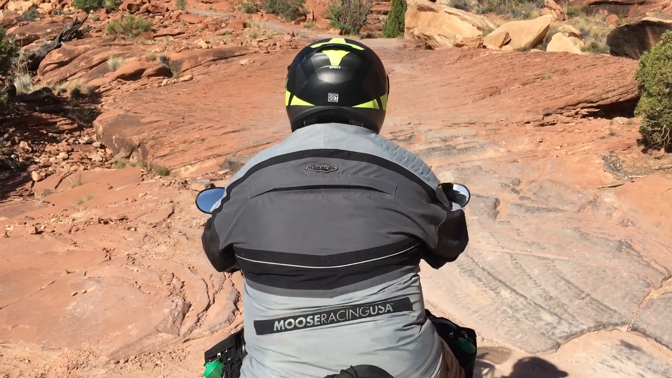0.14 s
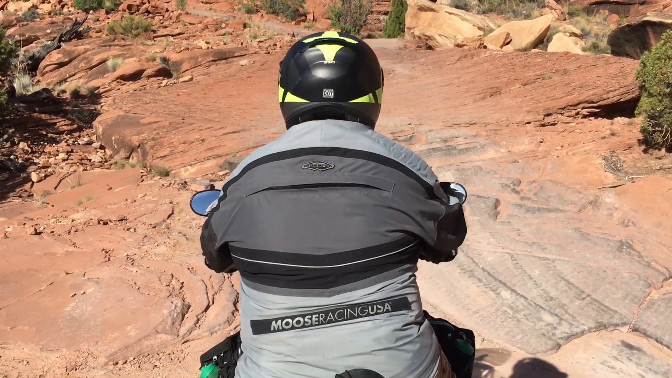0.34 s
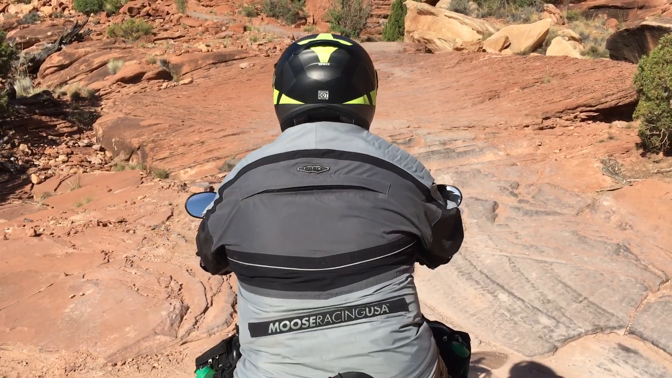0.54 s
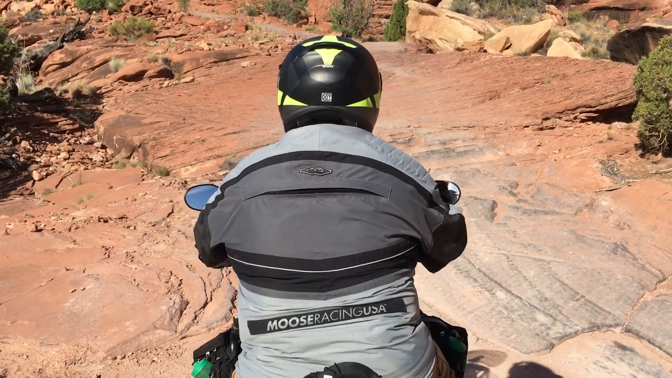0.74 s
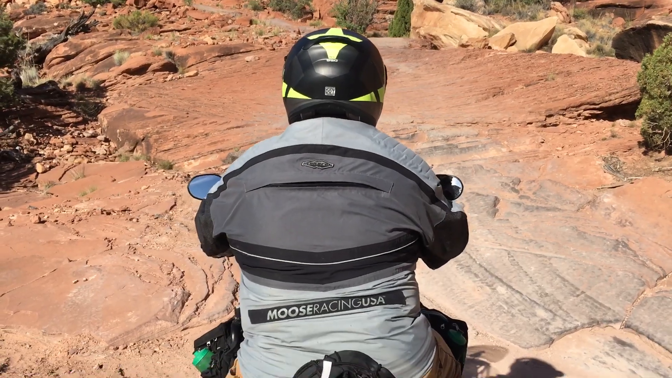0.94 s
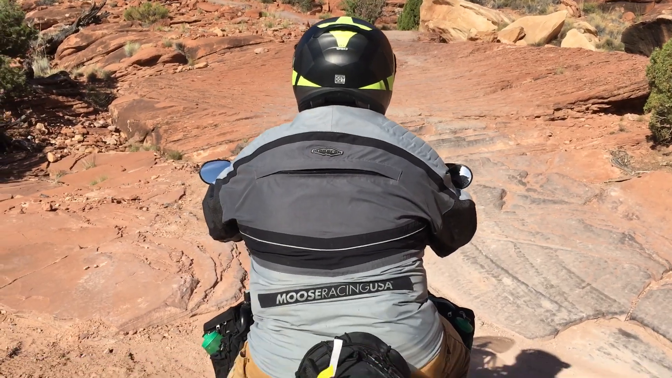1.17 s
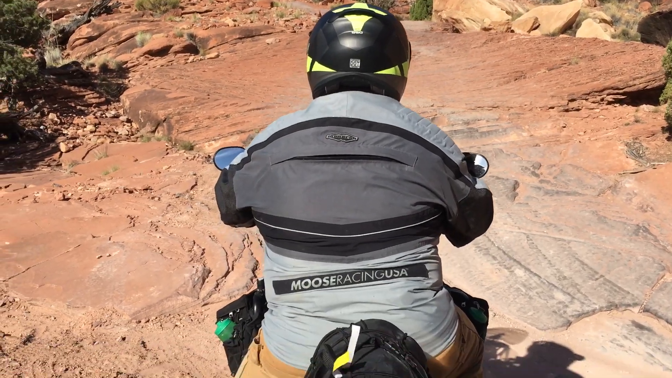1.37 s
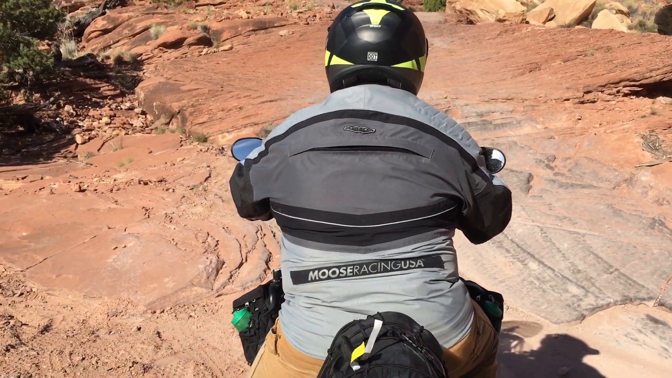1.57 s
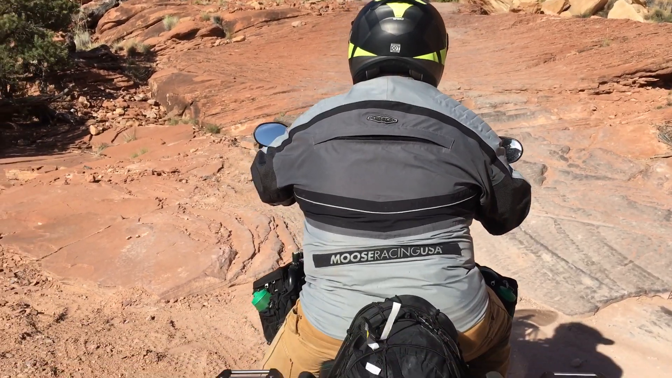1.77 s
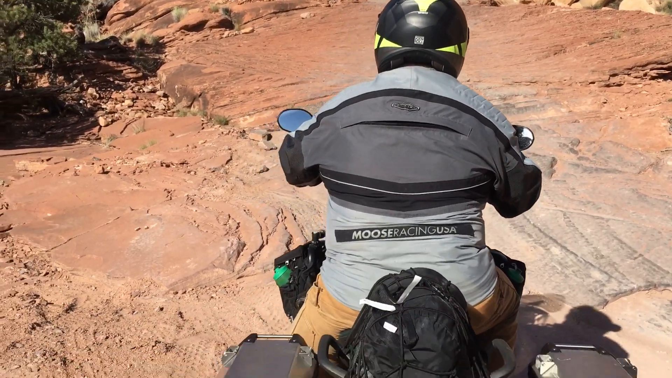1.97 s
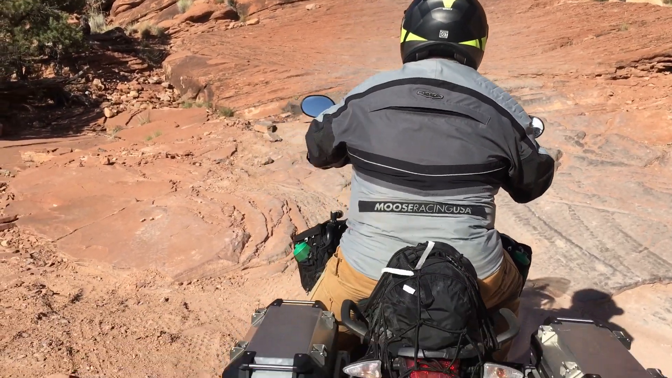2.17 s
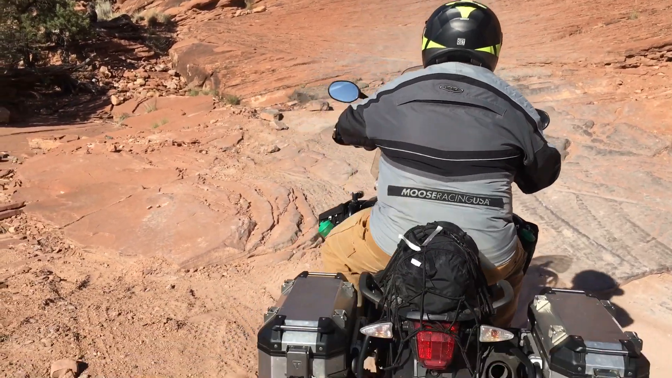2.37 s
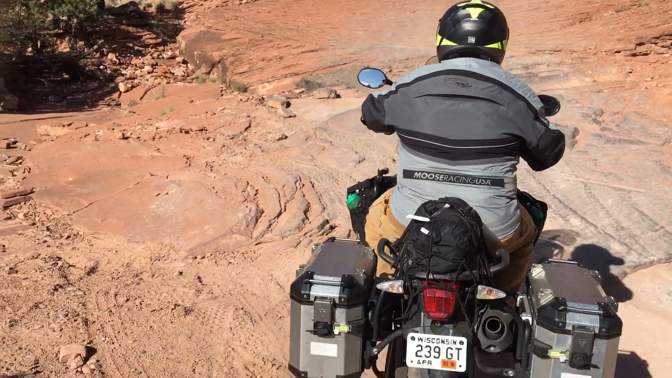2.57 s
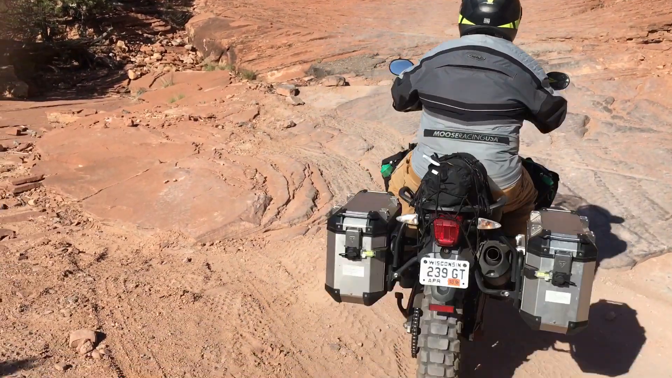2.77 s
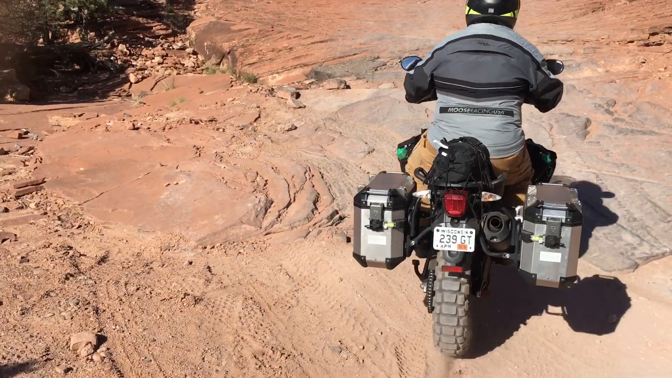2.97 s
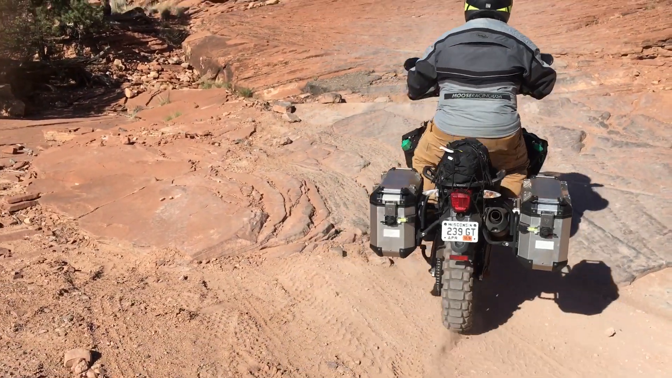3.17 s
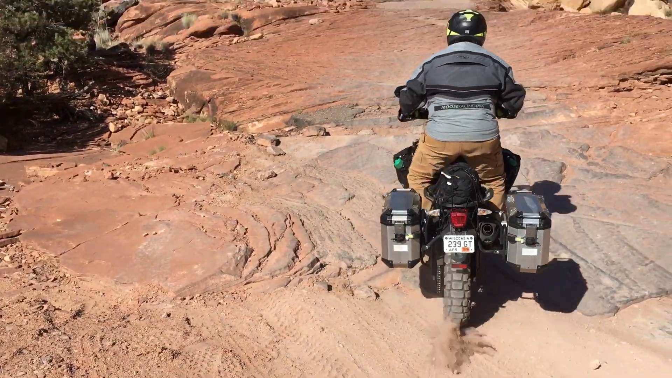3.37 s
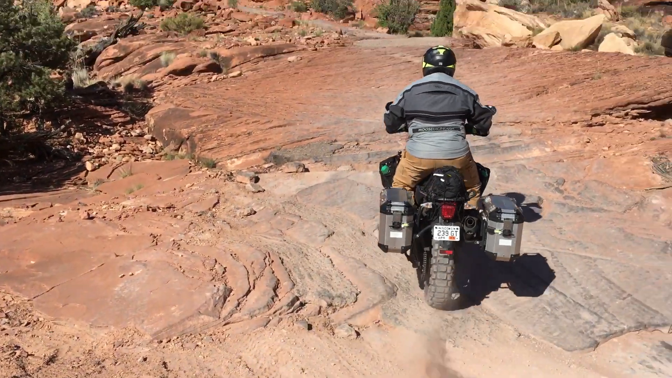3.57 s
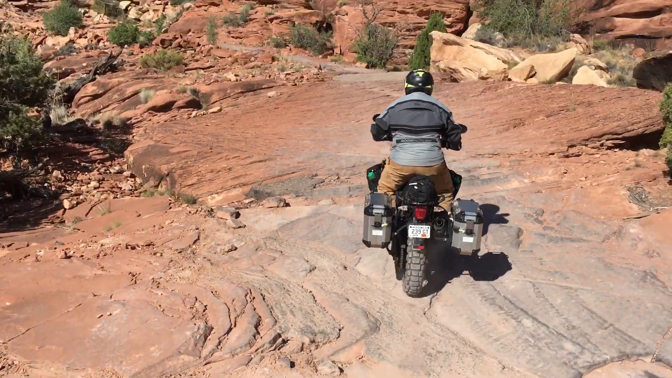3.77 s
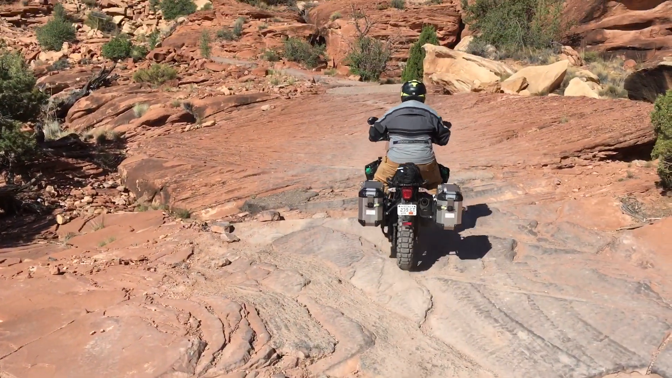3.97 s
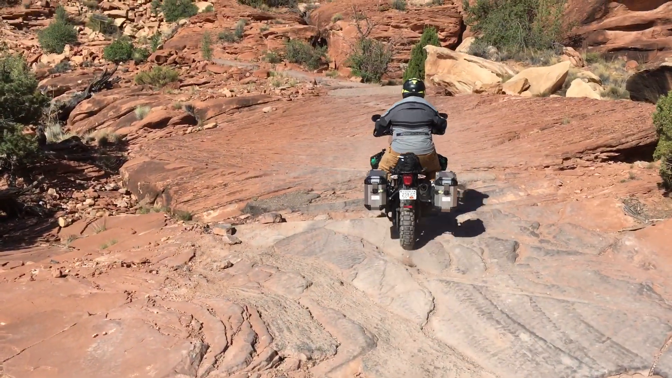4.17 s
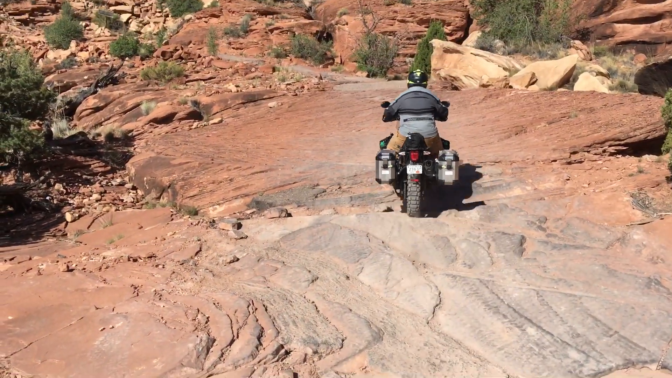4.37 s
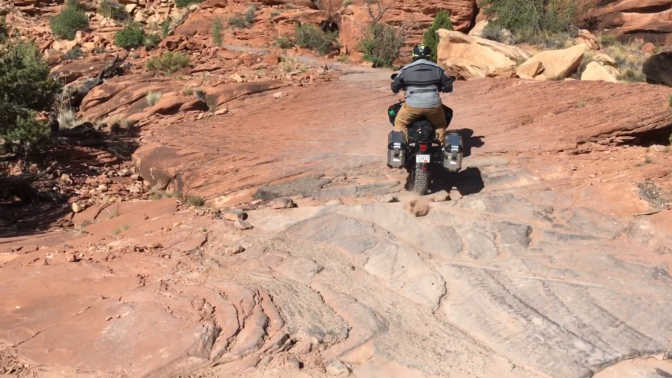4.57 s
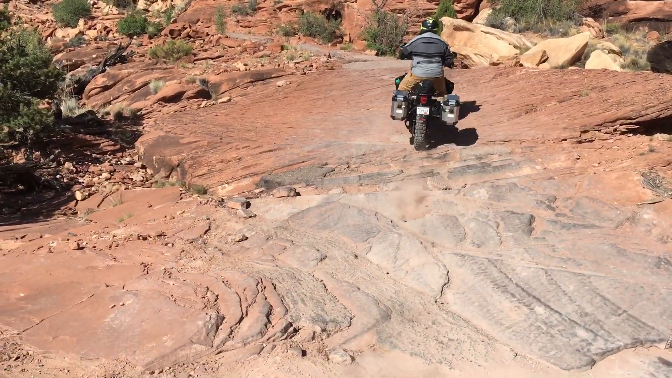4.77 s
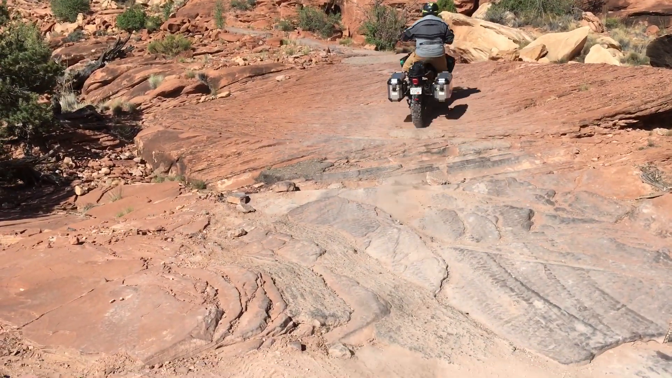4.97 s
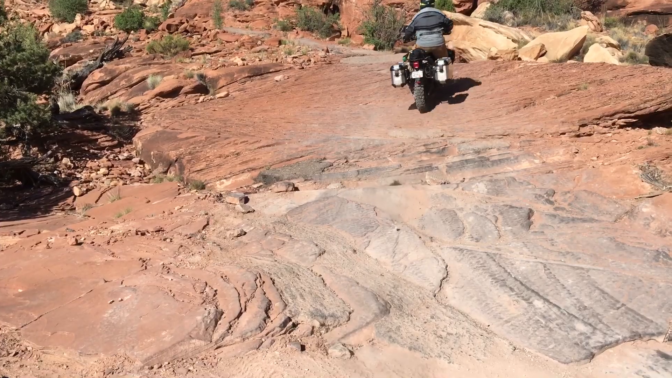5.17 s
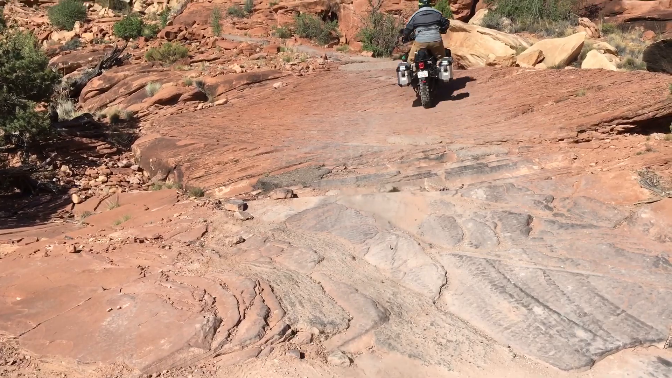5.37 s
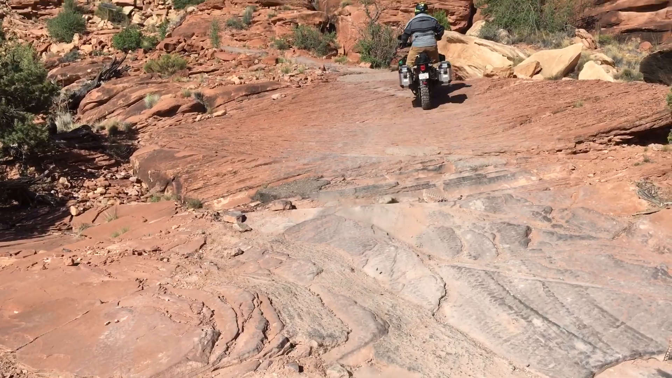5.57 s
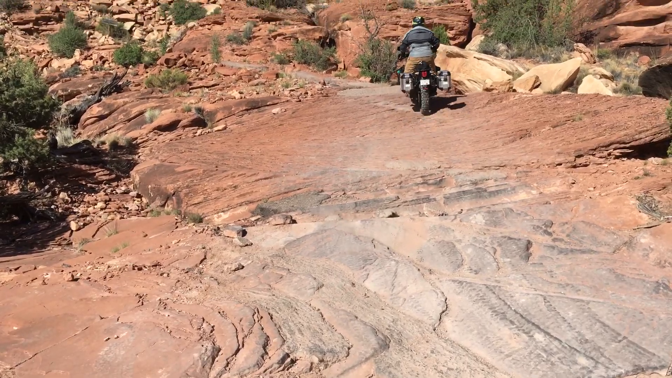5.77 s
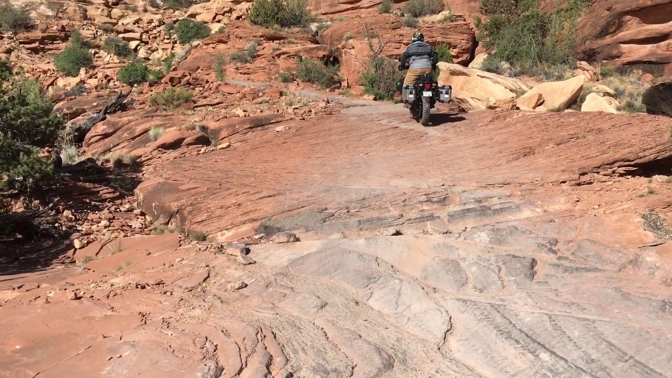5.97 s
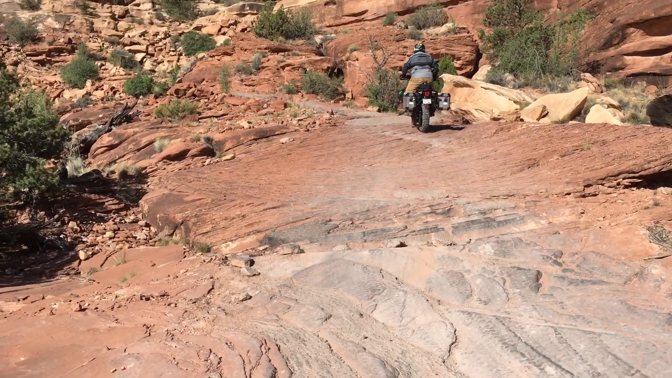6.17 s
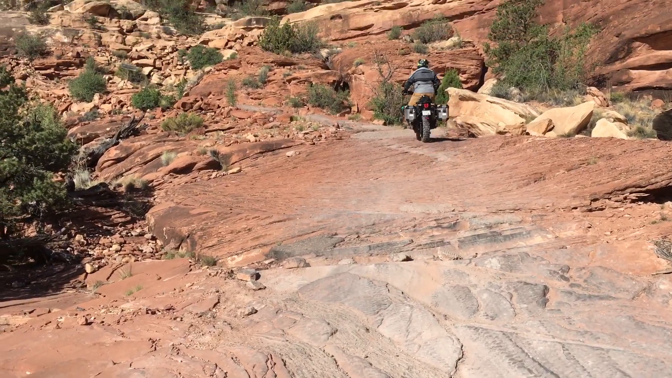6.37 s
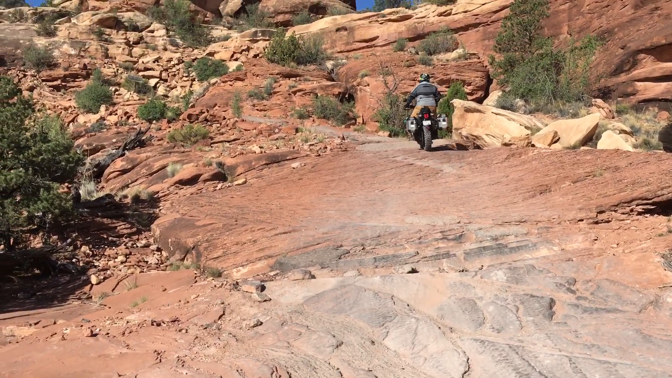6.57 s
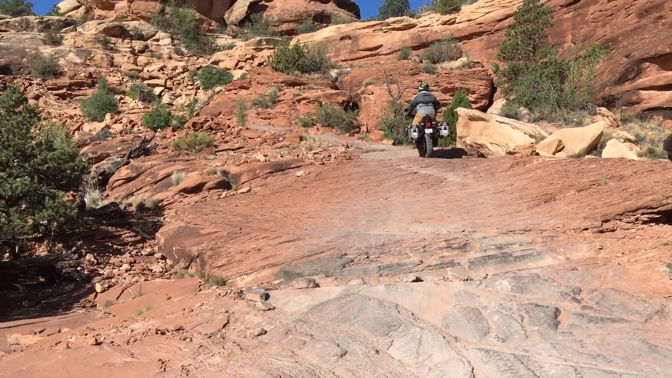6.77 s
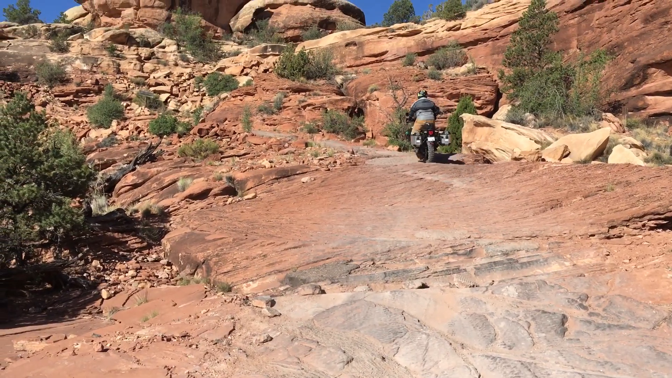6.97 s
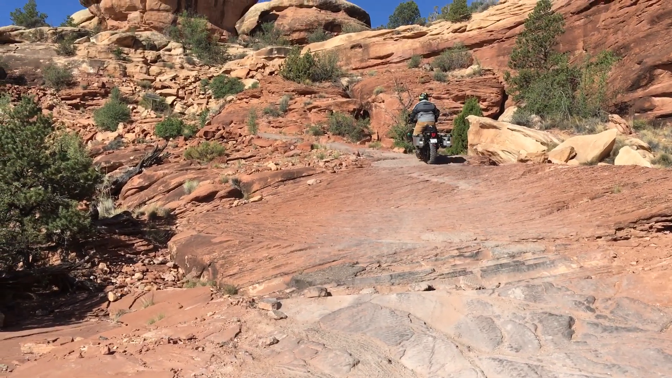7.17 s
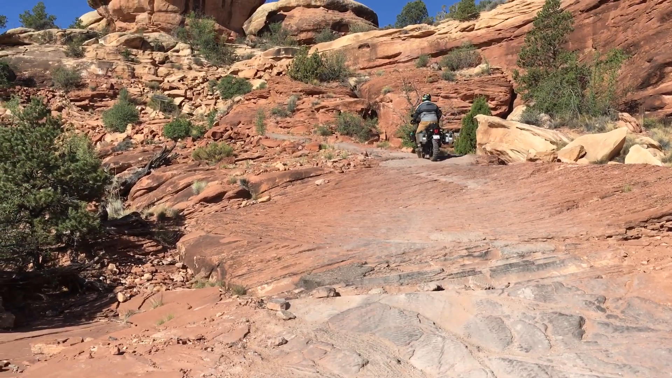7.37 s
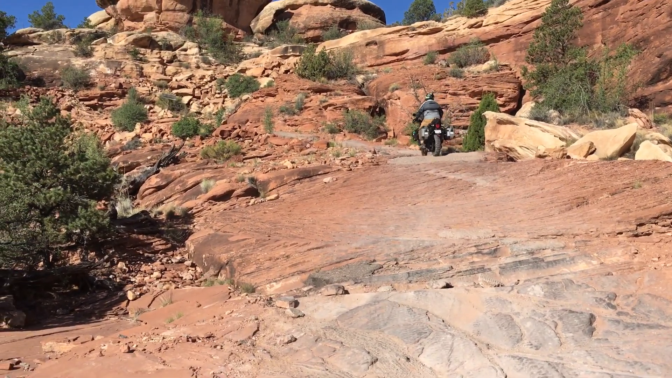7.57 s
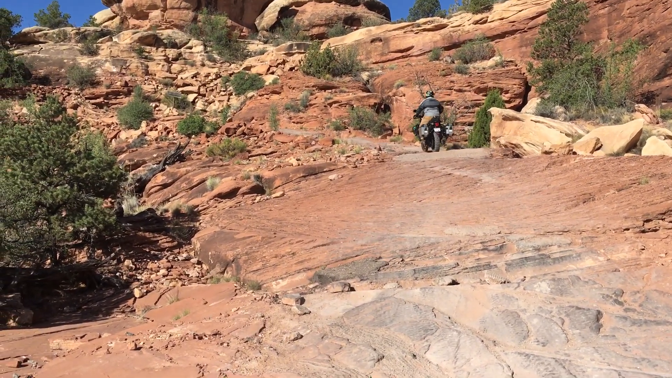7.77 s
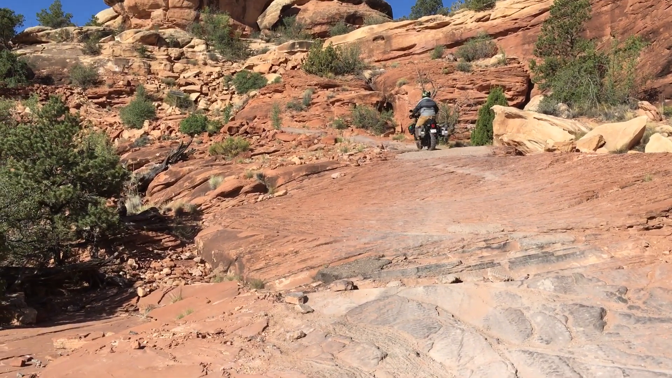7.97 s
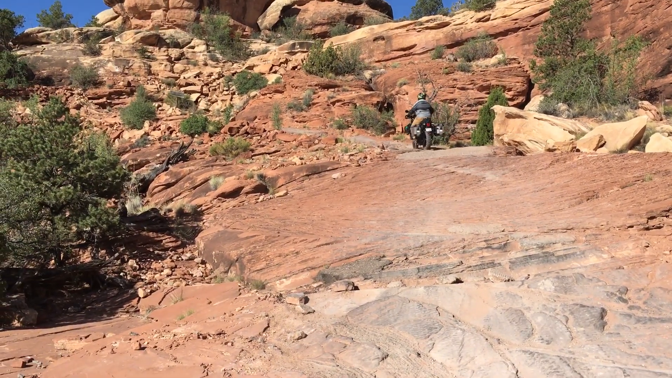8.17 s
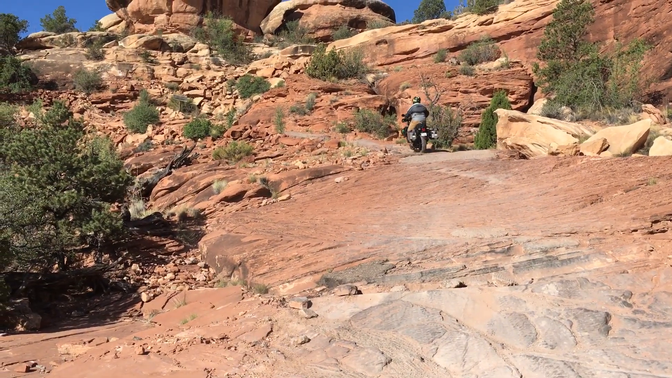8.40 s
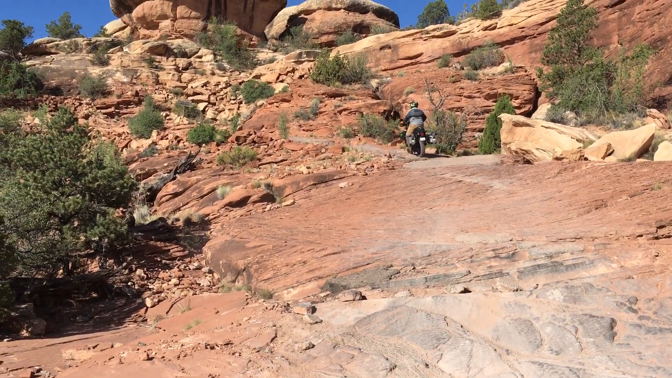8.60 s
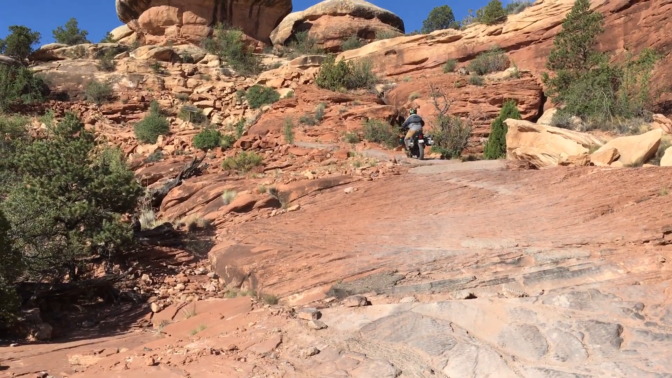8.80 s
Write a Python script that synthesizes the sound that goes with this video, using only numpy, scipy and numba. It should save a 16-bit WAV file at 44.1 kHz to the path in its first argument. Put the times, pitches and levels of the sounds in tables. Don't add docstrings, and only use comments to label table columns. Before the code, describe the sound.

Outdoors on a rocky slope, a nearby motorcycle lopes at idle for about a second, then pulls off with rising revs, hissing exhaust and whining gears. Bursts of throttle surge and drop as tyres spit grit and luggage rattles over ledges. After a stumble and muffled afterfire, two sharp revs rise, then smaller ones recede, duller and thinner. A fixed microphone hears faint low wind and short echoes from rock walls.

```python
import sys
import numpy as np
from scipy import signal
from scipy.fft import rfft, irfft
from scipy.io import wavfile
from scipy.ndimage import uniform_filter1d
from numba import njit

SR = 44100
rng = np.random.default_rng(int(sys.argv[2]) if len(sys.argv) > 2 else 0)


def invert_db(x):
    u = np.asarray(x, float) / 20
    return 10 ** u


def output_pcm(signal):
    pcm = np.clip(np.atleast_2d(signal).T, -1, 1) * 32767
    wavfile.write(sys.argv[1], SR, np.round(pcm).astype(np.int16))


N = 389844


def unit(x):
    return x / np.sqrt(np.mean(x ** 2))


def steady(x, span_s):
    size = int(span_s * SR)
    power = uniform_filter1d(uniform_filter1d(x ** 2, size), size)
    return x / np.sqrt(power + 1e-12)


def columns(table):
    s, *rest = np.transpose(table)
    return [np.interp(np.arange(N) / SR, s, c) for c in rest]


def spans(table, edge_s):
    t = np.arange(N) / SR
    return sum(h * np.clip(np.minimum(t - a, b - t) / edge_s + .5, 0, 1) for a, b, h in table)


def level_spans(table, edge_s):
    return spans([(a, b, invert_db(db)) for a, b, db in table], edge_s)


def cut(x, hz, kind, order=2):
    return signal.sosfilt(signal.butter(order, hz, kind, fs=SR, output="sos"), x)


def cut_in_place(x, hz, kind="low"):
    return signal.sosfiltfilt(signal.butter(4, hz, kind, fs=SR, output="sos"), x)


@njit
def svf(x, hz, width):
    y, b, l = np.empty(len(x)), 0., 0.
    for i in range(len(x)):
        g, k = np.tan(np.pi * hz[i] / SR), width / hz[i]
        v = (b + g * (x[i] - l)) / (1 + g * (g + k))
        b, l, y[i] = 2 * v - b, l + 2 * g * v, k * v
    return y


def modes(x, table, tune=0.901, flip=1):
    out = 0
    for k, (hz, width, db) in enumerate(table):
        out = out + flip ** k * invert_db(db) * svf(x, hz * tune * np.ones(N), 1. * width)
    return out


def coloured(spectrum):
    hz, db = np.transpose(spectrum)
    bins = np.arange(N // 2 + 1) * SR / N + 1
    gain = invert_db(np.interp(np.log(bins), np.log(hz), db))
    return unit(irfft(rfft(rng.standard_normal(N)) * gain, N))


def walk(rate):
    k = int(SR / rate)
    return uniform_filter1d(np.repeat(rng.standard_normal(N // k + 1), k), k)[:N]


# (frequency [Hz], level [dB per Hz])
AIR_SPECTRUM = [(12, -42), (20, -12), (49, -2), (137, 0), (208, -9), (324, -30), (860, -27), (1340, -37),
                (2280, -36), (15600, -57)]


def open_air():
    return invert_db(-45 + 2.2 * walk(1.1)) * coloured(AIR_SPECTRUM)


def rocks(x):
    t = np.arange(SR // 3) / SR
    tail = rng.standard_normal(len(t)) * 1000 ** (-t / 0.28) * (t > .012)
    return invert_db(-9.5) * signal.fftconvolve(x, tail / np.sqrt(np.sum(tail ** 2)))[:N]


HIT_T = np.arange(SR // 8) / SR


def hit_noise(table, band_hz, order=2):
    return cut(rng.standard_normal((len(table), len(HIT_T))), band_hz, "band", order)


def place(times, hits):
    out = np.zeros(N + SR)
    for s, hit in zip(times, hits):
        out[int(s * SR):int(s * SR) + len(hit)] += hit
    return out[:N]


# (time [s], peak level [dB])
SUSPENSION_THUMPS = [(4.187, -13), (4.529, -10), (4.698, -8.5), (4.847, -13), (4.91, -10.5), (4.989, -11)]


def thumps():
    decay = 1000 ** (-HIT_T / 0.054)
    noise = hit_noise(SUSPENSION_THUMPS, [110, 340])
    hits = [invert_db(db - 6.5) * unit(n) * decay for (s, db), n in zip(SUSPENSION_THUMPS, noise)]
    return place([s for s, db in SUSPENSION_THUMPS], hits)


# (time [s], peak level [dB])
GRIT_TICKS = [(2.663, -19), (2.697, -10), (2.795, -20), (2.977, -19), (3.064, -12), (3.9835, -18),
              (4.1707, -16), (4.257, -14), (4.506, -15), (4.53, -12), (4.6433, -9.5), (4.7448, -7.5),
              (4.7556, -13), (4.7816, -4), (4.7908, -5), (4.8305, -14), (4.865, -16), (4.9143, -13),
              (5.1777, -22), (5.228, -11.5), (5.519, -22), (5.595, -22), (5.689, -24), (6.338, -21),
              (6.373, -19.5), (6.424, -13.5), (7.046, -23), (7.24, -23), (7.427, -17.5), (8.1664, -29)]


def grit():
    length_s = 0.0076
    swell = np.exp(-((HIT_T - 0.87 * length_s) / (0.47 * length_s)) ** 2)
    noise = hit_noise(GRIT_TICKS, [3000, 13500])
    hits = [invert_db(db - 19.5) * n * swell for (s, db), n in zip(GRIT_TICKS, noise)]
    return place([s for s, db in GRIT_TICKS], hits)


# (time [s], peak level [dB], ring frequency [Hz])
LUGGAGE_KNOCKS = [(2.7944, -26.5, 815), (3.8897, -26, 885), (3.9963, -23, 720), (4.1929, -25, 757),
                  (4.2183, -26.5, 770), (4.4598, -29, 760), (4.5575, -30, 1500), (4.6483, -31, 1130),
                  (4.6952, -37, 669), (4.7145, -24.5, 1660), (4.803, -27, 1500), (4.9117, -30, 655),
                  (4.9526, -31, 700), (4.9954, -33, 662), (5.0194, -34, 721), (5.1292, -31.5, 1380),
                  (5.343, -32.5, 1500), (5.4778, -30.5, 1310), (5.5226, -36, 1240), (5.6015, -35, 1430),
                  (5.7895, -34, 845), (6.3899, -34.5, 1273), (6.4714, -37, 1200), (6.896, -36.5, 593),
                  (6.9885, -38, 1440), (7.186, -36.5, 1596), (7.373, -37, 1630), (7.9793, -37, 670),
                  (8.1165, -33.5, 1600), (8.7311, -38, 1162)]


def knocks():
    hits = []
    for (s, db, hz), n in zip(LUGGAGE_KNOCKS, hit_noise(LUGGAGE_KNOCKS, [600, 2200], order=3)):
        ring = 1.44 * np.sin(2 * np.pi * hz * HIT_T) * 1000 ** (-HIT_T / .028)
        crack = 0.93 * unit(n) * np.exp(-HIT_T / 0.0053)
        hits.append(invert_db(db + 0.5) * (ring + crack))
    return place([s for s, db, hz in LUGGAGE_KNOCKS], hits)


# (start time [s], end time [s], level [dB])
CHATTER_BURSTS = [(3.38, 3.46, -37), (4.17, 4.23, -37), (4.3, 4.48, -39), (4.5, 4.56, -31),
                  (4.69, 4.73, -37), (4.84, 4.89, -38), (4.912, 4.985, -33), (4.995, 5.03, -30)]
# (frequency [Hz], width [Hz], level [dB])
FRAME_MODES = [(670, 130, 0), (800, 150, -1), (1500, 300, -12)]


def chatter():
    clicks_per_s = 600
    clicks = (rng.random(N) < clicks_per_s / SR) * rng.standard_normal(N)
    ring = cut(modes(clicks, FRAME_MODES, tune=1), [540, 1900], "band")
    return level_spans(CHATTER_BURSTS, .015) * unit(ring)


# (time [s], tail pipe tuning factor as the gas heats, clean share of the bark, distance [m])
RIDE = [(0, .98, 1, 1.5), (1.1, .98, 1, 1.5), (1.6, 1.05, 1.2, 2), (2.5, 1.02, 1.2, 3), (3.2, 1.09, .9, 5),
        (3.5, .9, .5, 8), (5, .85, .4, 16), (6, .95, .5, 24), (7, .9, .5, 30), (8.84, .9, .5, 36)]
START_M = RIDE[0][3]


def ride():
    return columns(RIDE)


# (time [s], firing rate [Hz], eagerness of the swing [0-1], throttle level [dB])
WRIST_TURNS = [(0, 31.16, .5, -5), (1.08, 30.9, 0.61, -4), (1.765, 86.83, .56, 5.5), (2.05, 70.51, .55, 6),
               (2.311, 68.3, 0.61, 4), (2.55, 71.8, .5, 4), (2.87, 45.87, .55, 3.5), (3.35, 93.44, .6, 8.5),
               (3.791, 73.86, .58, 6.5), (4.13, 83.9, .5, 6.5), (4.3, 79.68, .5, 7),
               (4.499, 94.66, .5, 8.5), (4.751, 81.43, .6, 7.5), (5.0, 89.94, .5, 6.5),
               (5.101, 88.93, 0.42, 5), (5.235, 118.1, .5, 8), (5.52, 43.38, .5, 2),
               (5.64, 42.7, 0.25, 0.5), (6.015, 123.6, .52, 10), (6.38, 73.8, .5, 4.5),
               (6.58, 83.25, .6, 3.5), (6.8, 83.58, 0.64, 3), (7.09, 62.88, .6, 2), (7.362, 83.47, .5, 4),
               (7.609, 68.76, .55, 1.5), (7.935, 96, .52, 4.5), (8.3, 60.78, .5, 1.5),
               (8.49, 73.84, .5, 0.5), (8.682, 62, .5, 1), (8.84, 61.5, 0.6, 2.5)]


def wrist():
    roundness = .6
    s, hz, eager, throttle_db = np.transpose(WRIST_TURNS)
    turn = np.interp(np.arange(N) / SR, s, np.arange(len(s)))
    k = np.minimum(turn.astype(int), len(s) - 2)
    bend = np.log(np.clip(eager[k + 1], .1, .9)) / np.log(.5)
    u = (turn - k) ** bend
    u = u + roundness * ((1 - np.cos(np.pi * u)) / 2 - u)
    return [uniform_filter1d(c[k] + u * (c[k + 1] - c[k]), size=SR // 25) for c in (hz, throttle_db)]


# (time [s], level [dB])
ENGINE_LOAD = [(0, -18.5), (1.05, -18), (1.24, -13.5), (1.36, -14), (1.52, -16.5), (1.8, -27.5),
               (2.0, -14.5), (2.9, -14), (3.1, -9.5), (3.3, -13.5), (4.2, -13.5), (5.1, -17.5), (5.6, -21),
               (6.6, -23), (7.3, -23), (7.6, -29), (8.1, -23.5), (8.84, -34.5)]
# (time [s], half length [s], change [dB])
BOOM_STUMBLES = [(1.35, 0.043, -10), (1.45, .03, -11), (4.34, .05, -2), (4.5, 0.022, -1.5),
                 (4.6, 0.051, -2.5), (4.99, .03, -1.5), (5.22, 0.02, 9), (5.298, 0.057, -31),
                 (5.482, 0.057, -8), (5.65, .05, -4), (6.237, 0.038, -16), (6.857, 0.046, -8.5),
                 (7.45, 0.034, -11), (8.307, 0.064, -4.5), (7.73, 0.069, 3), (8.665, 0.066, -9)]
# (time [s], level [dB])
TYRE_GROUND = [(0, -1), (1.1, -0.5), (1.7, 1), (3, 0), (4.9, 2.5), (5.3, 0.5), (6.2, -3.5), (7.1, 2),
               (7.8, -4.5), (8.84, -7.5)]


def levels(hz, throttle_db):
    spread_db = 10
    knee_hz, fall_db = 81, 0.6
    t = np.arange(N) / SR
    heard_db = throttle_db - spread_db * np.log10(ride()[2] / START_M)
    boom_db = columns(ENGINE_LOAD)[0] - fall_db * (np.maximum(hz - knee_hz, 0) / 10) ** 2
    boom_db = boom_db + sum(db * np.exp(-((t - s) / half) ** 2) for s, half, db in BOOM_STUMBLES)
    over_db = -22 + 0.88 * heard_db
    level_db = 10 * np.log10(invert_db(boom_db) ** 2 + invert_db(over_db) ** 2)
    hiss_db = -35.5 + heard_db + columns(TYRE_GROUND)[0]
    return level_db, over_db - level_db, -36.5 + heard_db, hiss_db


def mesh(centre_hz, width):
    ring = svf(svf(rng.standard_normal(N), centre_hz, width), centre_hz, width)
    return steady(ring, .15) * invert_db(3.2 * walk(25))


# (time [s], level [dB])
PRIMARY_PULL = [(0, -20), (1.15, -13), (1.37, -2), (1.5, -5), (2, -5), (2.6, -6), (2.75, -10), (3.1, -12),
                (3.7, -16), (5, -14), (5.22, -8), (5.45, -8), (5.6, -14), (5.72, -6), (6.1, -9), (7.1, -9),
                (8.3, -5), (8.84, -5)]
# (start time [s], end time [s], level [dB])
PRIMARY_OCTAVE = [
    (1.35, 1.6, -13),
    (1.6, 1.85, -16),
    (1.85, 2.62, -21),
    (2.95, 3.47, -19),
]
# (start time [s], end time [s], level [dB])
TIMING_WHINE = [
    (-1, 1.5, -6),
    (1.5, 1.68, -14),
    (1.68, 1.95, -24),
    (1.95, 2.7, -12),
    (5.5, 5.7, -12),
]


def gears(hz, hiss_db):
    sag_per_m = 0.00085
    primary_hz = 34.25 * (1 - sag_per_m * ride()[2]) * hz
    timing_hz = 80.9 * hz + 253
    primary = invert_db(columns(PRIMARY_PULL)[0]) * mesh(primary_hz, 230.0)
    octave = level_spans(PRIMARY_OCTAVE, .12) * mesh(2 * primary_hz, 260.0)
    timing = level_spans(TIMING_WHINE, .12) * mesh(timing_hz, 230.0)
    throb = 1 + .35 * np.cos(2 * np.pi * np.cumsum(hz) / SR)
    return invert_db(hiss_db) * throb * (primary + octave + timing)


# (frequency [Hz], level [dB per Hz])
GAS_SPECTRUM = [(710, -38), (1200, 0.5), (1390, 0), (1990, -0.5), (2240, -5), (3190, -3), (6060, -8.5),
                (7680, -13.5), (8640, -9.5), (10400, -13), (15600, -8)]


def hiss(puff, metres):
    out = steady((0.69 * puff + 0.33) * invert_db(2.1 * walk(40)) * coloured(GAS_SPECTRUM), 0.098)
    out = out - np.clip(1.1 - 0.36 * metres, 0, .5) * cut(out, 3300, "high")
    return out + (invert_db(.5 - .18 * metres) - 1) * cut(out, 6600, "high")


# (frequency [Hz], width [Hz], level [dB])
TAIL_PIPE = [(590, 80, 1), (710, 200, -7), (850, 120, 2.5), (1100, 280, -15), (1656, 126, -9)]
# (frequency [Hz], width [Hz], level [dB])
FAR_CASES = [(420, 85, -2.5), (626, 270, 8), (987.4, 380, -17), (1600, 180, -8.5)]


def bark(pulses, rush):
    tune, clean, metres = ride()
    sharp = steady(pulses, .06)
    crack = 1.2 * cut(sharp, [520, 950], "band")
    tune = tune * (1 + .0015 * metres * walk(9))
    near = cut(modes(clean * crack + rush, TAIL_PIPE, tune), 490, "high", order=4)
    distant = modes(rush + clean * sharp, FAR_CASES, tune=0.94)
    far = .72 * np.clip((metres - 15) / (29 - 15), 0, 1)
    return steady((1 - far) * steady(near, .2) + far * steady(distant, .2), 0.04)


def gas(pulses, bark_db, hiss_db):
    metres = ride()[2]
    pulses = np.roll(pulses, int(.009 * SR))
    puff = unit(signal.lfilter([1], [1, -np.exp(-1 / (0.027 * SR))], pulses))
    rush = steady((puff + .8) * rng.standard_normal(N) * invert_db(2.0 * walk(30)), .1)
    rumble = steady(cut(rush, [230, 380], "band"), 0.06)
    voice = bark(pulses, rush) + invert_db(-7 - 0.12 * metres) * rumble
    return invert_db(bark_db) * voice + invert_db(hiss_db - 2.5) * hiss(puff, metres)


# (time [s], half length [s], ring frequency [Hz], peak level [dB])
SILENCER_WOOFS = [
    (5.272, .022, 80, -17),
    (6.03, .07, 78, -31),
    (6.2, .03, 90, -30),
    (7.415, .012, 66, -25),
    (8.51, .015, 74, -22),
]


def afterfires():
    t = np.arange(N) / SR
    out = np.zeros(N)
    for s, half, hz, db in SILENCER_WOOFS:
        out += invert_db(db) * np.exp(-((t - s) / half) ** 2) * np.sin(2 * np.pi * hz * (t - s))
    return out


# (start time [s], end time [s], roughness [0-1])
ROUGH_RUNNING = [
    (5.26, 5.52, .55),
    (6.22, 6.27, .25),
    (7.39, 7.43, .9),
    (8.48, 8.54, .9),
]


def burn():
    idle_ends_s, idle_fade_s = 1.1, .4
    idle = np.clip(1 - (np.arange(N) / SR - idle_ends_s) / idle_fade_s, 0, 1)
    rough = spans(ROUGH_RUNNING, .06)
    depth = .08 + .92 * idle + .25 * rough
    return depth, .35 + .15 * idle + 4.5 * rough, .0035 + .05 * rough


CYLINDER_LEVELS = [8, 11, 6]


def firings(hz):
    depth, scatter_db, jitter = burn()
    turns = .48 + np.cumsum(hz) / SR
    count = np.arange(0, int(turns[-1]) + 1)
    at = np.interp(count, turns, np.arange(N))
    i = at.astype(int)
    chance = rng.standard_normal((2, len(at)))
    size = invert_db(depth[i] * np.array(CYLINDER_LEVELS)[count % 3] + scatter_db[i] * chance[0])
    at = np.clip(at + jitter[i] * chance[1] * SR / hz[i], 0, N - 2)
    pulses = np.zeros(N)
    pulses[at.astype(int)] += size * (1 - at % 1)
    pulses[at.astype(int) + 1] += size * (at % 1)
    return pulses


# (frequency [Hz], width [Hz], level [dB])
CHAMBERS = [(67.4, 20.1, 6.5), (96, 40.9, 4.5)]
# (frequency [Hz], width [Hz], level [dB])
PIPE_OVERTONES = [(148, 5.5, -29), (199.3, 4.5, -11.5)]


def exhaust(pulses, level_db, overtones_db):
    chambers = np.roll(modes(pulses, CHAMBERS, flip=-1), int(.0059 * SR))
    ring = chambers + modes(pulses, PIPE_OVERTONES, flip=-1)
    ring = cut(cut(ring, 270, "low", order=4), 60, "high", order=3)
    ring = cut_in_place(ring, 300)
    upper = np.clip(.5 - 0.65 * (ride()[2] - START_M), -.55, 1)
    ring = ring + upper * cut_in_place(ring, 243, "high")
    boom = cut_in_place(ring, 112)
    share = np.clip(invert_db(overtones_db), 0, .99)
    mix = np.sqrt(1 - share ** 2) * steady(boom, 0.13) + share * steady(ring - boom, 0.036)
    return invert_db(level_db) * mix


def scene():
    hz, throttle_db = wrist()
    level_db, overtones_db, bark_db, hiss_db = levels(hz, throttle_db)
    pulses = firings(hz)
    bumps = thumps() + grit() + knocks() + chatter()
    treble = bumps + gears(hz, hiss_db) + gas(pulses, bark_db, hiss_db)
    low = afterfires() + exhaust(pulses, level_db, overtones_db)
    return (open_air() + rocks(treble) + treble + low)[None]


def top_cut(x):
    return signal.sosfilt(signal.butter(12, 15740, fs=SR, output="sos"), x)


def record(dry):
    return top_cut(dry)


dry = scene()
out = record(dry)
output_pcm(out)
```